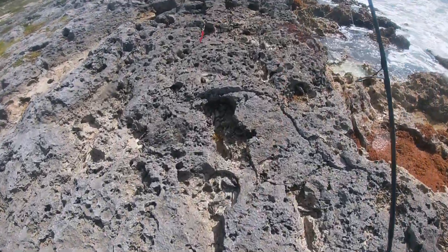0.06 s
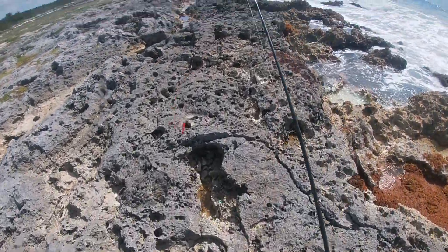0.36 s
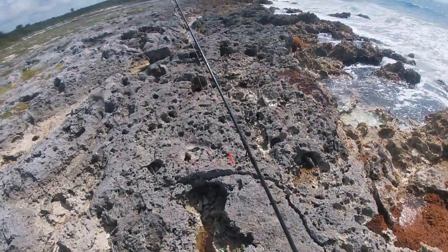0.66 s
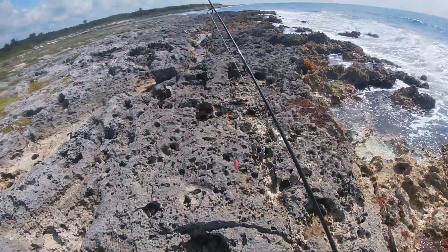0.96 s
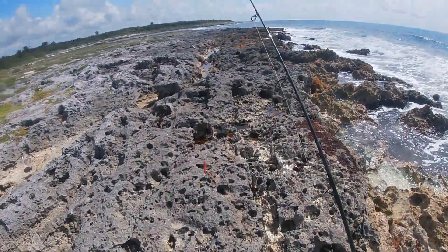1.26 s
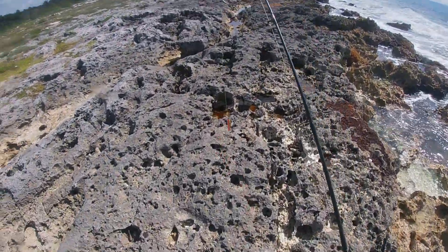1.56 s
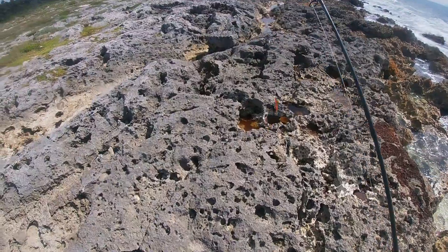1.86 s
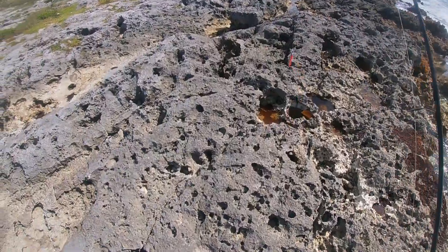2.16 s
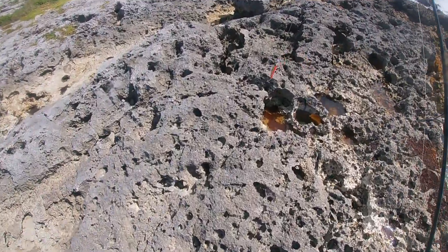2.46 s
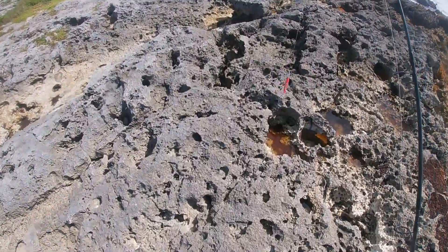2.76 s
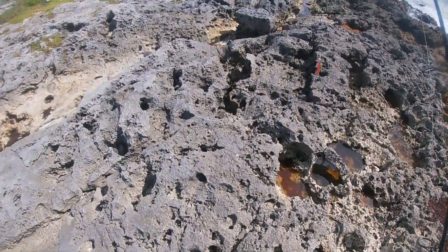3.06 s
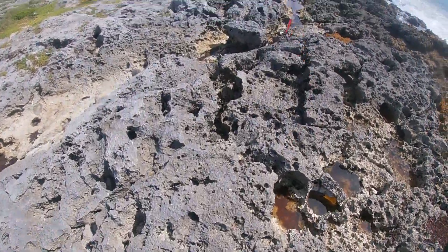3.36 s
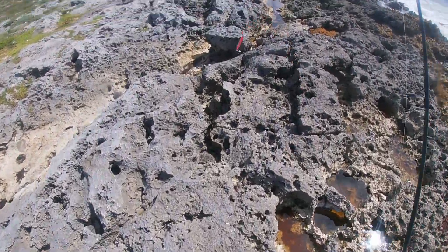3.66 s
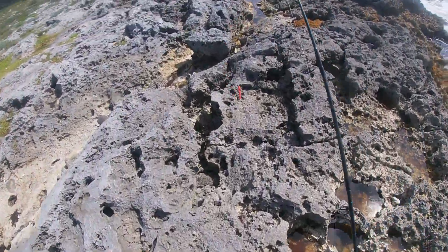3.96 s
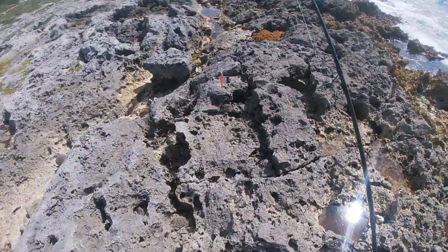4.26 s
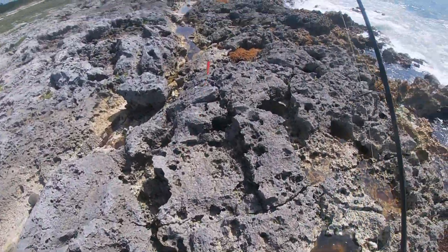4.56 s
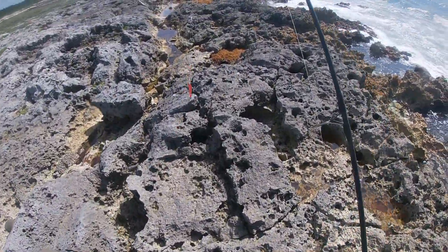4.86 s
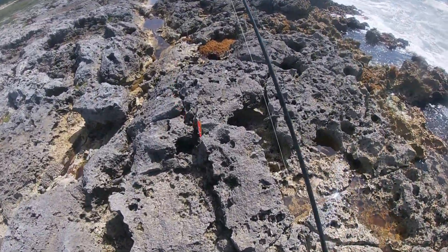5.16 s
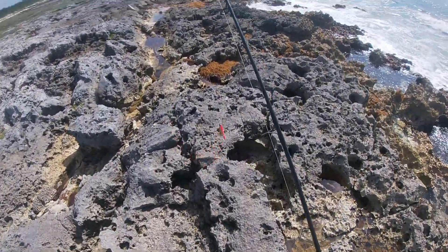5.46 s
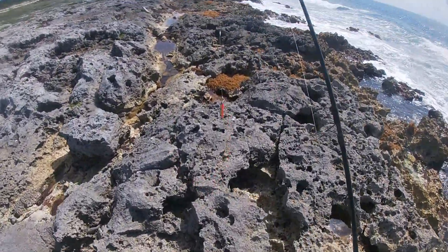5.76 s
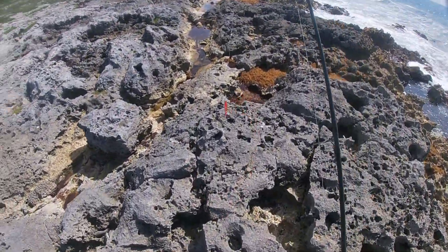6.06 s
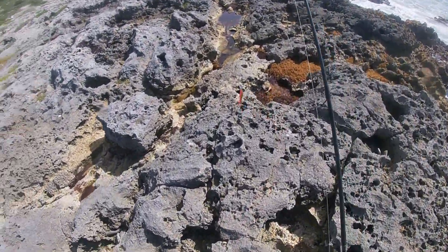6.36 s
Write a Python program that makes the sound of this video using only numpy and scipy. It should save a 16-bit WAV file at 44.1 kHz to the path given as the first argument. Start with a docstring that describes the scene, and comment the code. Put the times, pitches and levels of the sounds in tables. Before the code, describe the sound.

Slow footsteps on rock land as deep, dull thumps, with light gear clinks, over faint, hollow-sounding surf and wind.

```python
"""A rocky shore, crossed in slow steps and heard from a body-worn camera in a waterproof case.
Each footfall jolts the camera into a deep, dull thump; carried gear clinks and now and then a sole
scuffs grit. Waves swell over a steady wash, wind buffets the case, and a faint, airy hiss slowly fades.
The case gives surf, clinks and scuffs a hollow, ringing colour, and the camera's gain control
ducks the whole sound after the heaviest steps."""
import sys
import numpy as np
from scipy import signal
from scipy.fft import rfft, irfft
from scipy.io import wavfile
from scipy.ndimage import uniform_filter1d

SR = 44100
rng = np.random.default_rng(int(sys.argv[2]) if len(sys.argv) > 2 else 0)


def generate_wav(signal):
    """Clip the signal to [-1, 1] and save it as 16-bit WAV at the path in sys.argv[1]."""
    frames = np.transpose(np.atleast_2d(signal))
    scaled = np.clip(frames, -1, 1) * 32767
    pcm = np.round(scaled).astype(np.int16)
    wavfile.write(sys.argv[1], SR, pcm)


N = 287973
TIME, FREQS = np.arange(N) / SR, np.fft.rfftfreq(N, 1 / SR)


def gain_of(db):
    """Decibels to gain."""
    return 10 ** (np.asarray(db) / 20)


def unit_rms(x):
    """Scales to an rms of one."""
    return x / np.sqrt(np.mean(x ** 2) + 1e-30)


def eq_curve(points, hz):
    """Gain at each frequency, from (Hz, dB) points joined on a log-frequency axis."""
    point_hz, db = np.transpose(points)
    return gain_of(np.interp(np.log(hz + 1), np.log(point_hz + 1), db))


def resonances(modes, hz):
    """Power at each frequency of bell-shaped resonances, their widths taken at half power."""
    return sum(gain_of(db) ** 2 * 0.5 ** ((2 * (hz - centre) / width) ** 2) for centre, width, db in modes)


def noise(gains):
    """Noise of rms one, coloured by a gain at each frequency."""
    return unit_rms(irfft(rfft(rng.standard_normal(N)) * gains, N))


def swell(t, rise, fall):
    """A smooth build-up to one at time zero, easing into an exponential decay."""
    return np.exp(-(np.minimum(t, 0) / rise) ** 2 / 2) / np.cosh(np.clip(t / fall, 0, 50))


def swells(rows, floor_db):
    """Gain over time: each swell builds, peaks and ebbs, adding its power to a steady floor."""
    power = sum((gain_of(db) * swell(TIME - s, rise, fall)) ** 2 for s, db, rise, fall in rows)
    return np.sqrt(gain_of(floor_db) ** 2 + power)


def case_gain(hz):
    """The waterproof case passes sound mostly at the resonances of its walls and air space."""
    # The hollow ring of the case. Each row: centre in Hz, width in Hz, level in dB.
    modes = [(725, 124, -2.9), (1114, 239, -6), (1339, 82, -3.5), (1599, 193, -5.5), (1850, 156, -7.5),
             (2019, 159, 0.1), (2213, 125, -18.5), (2614, 254, -14), (2980, 190, -16), (3259, 183, -6.5),
             (3685, 315, -12.5), (4280, 220, -15.5), (4820, 430, -10.5), (5220, 460, -17.5),
             (6420, 710, -20.5), (7630, 290, -30), (8560, 860, -28.5), (10370, 940, -32.5)]
    # What leaks through the walls between resonances. Each row: frequency in Hz, level in dB.
    walls = [(60, -49), (150, -16), (300, -14.5), (480, -16.5), (900, -9), (1450, -28), (2380, -24.5),
             (4000, -24), (5800, -30.5), (7300, -32.5), (9500, -35.5), (12000, -40.5), (13500, -43.5),
             (16000, -57.5)]
    return np.sqrt(resonances(modes, hz) + eq_curve(walls, hz) ** 2)


def surf(sea_db=-62.5, boost_db=2, roar_hz=1020, fizz_hz=4330, patchy_db=0.88, flicker_db=0.31):
    """Foam hisses in drifting patches; the breakers add weight below and fizz above."""
    # Waves washing up the rock over the steady sea, both ahead of the boost.
    # Each row: crest time in seconds, level in dB, rise and fall in seconds.
    waves = [(1.38, -53.5, .55, 2.3), (3.45, -53, 1, 1.42), (4.15, -49.5, 0.32, 0.56),
             (5.88, -50.5, 0.88, 2.5)]
    # Weight of the breakers' roar. Each row: time in seconds, low shelf in dB.
    weight = [(0, 8), (.35, 5.5), (.7, -3.5), (2.0, -4), (3.0, -1.5), (3.5, 5), (4.2, -1.5), (5.0, 2.5),
              (5.8, -2), (6.25, 0)]
    # Fizz of the foam. Each row: time in seconds, high shelf in dB.
    fizz = [(0, -1), (.5, 0.5), (1.3, -1.5), (2.3, 1.5), (4.0, 0.9), (5.0, 2), (6.53, -0.5)]
    size, hop = 1024, 256
    t, hz = np.arange(N // hop + 5) * hop / SR, np.fft.rfftfreq(size, 1 / SR)
    real, imag, patches = rng.standard_normal((3, len(t), len(hz)))
    patches = uniform_filter1d(patches, size=10, axis=0)  # smeared in time, then in frequency
    patches = unit_rms(uniform_filter1d(patches, size=12, axis=1))
    flicker = unit_rms(uniform_filter1d(rng.standard_normal(len(t)), size=7))
    low_shelf, high_shelf = 1 / (1 + (hz / roar_hz) ** 4), 1 - 1 / (1 + (hz / fizz_hz) ** 8)
    tilt_db = np.outer(np.interp(t, *np.transpose(weight)), low_shelf)
    tilt_db += np.outer(np.interp(t, *np.transpose(fizz)), high_shelf)
    spectra = (real + 1j * imag) * gain_of(tilt_db + patchy_db * patches + flicker_db * flicker[:, None])
    wash = signal.istft(spectra.T, nperseg=size, noverlap=size - hop)[1][:N]
    hollow_wash = unit_rms(irfft(rfft(wash) * case_gain(FREQS), N))
    return hollow_wash * swells(waves, sea_db) * gain_of(boost_db)


def wind(breeze_db=-65.5):
    """Air flutters low around the case, swelling with each gust."""
    # Tone of the flutter. Each row: frequency in Hz, level in dB.
    flutter_eq = [(20, 3.5), (60, -12), (100, -16), (140, 0), (180, 5), (240, -3), (330, -13), (600, -17.5),
                  (2000, -76)]
    # Gusts buffeting the case. Each row: peak time in seconds, level in dB, rise and fall in seconds.
    gusts = [(.2, -53.5, .1, 0.14), (3.5, -58.5, 0.065, 0.17), (5.27, -60, 0.52, 0.15),
             (6.12, -55, 0.33, 0.27)]
    return noise(eq_curve(flutter_eq, FREQS)) * swells(gusts, breeze_db)


def airy_hiss(level_db=-60.5, hold_s=0.78, fade_db_per_s=3):
    """A faint, airy hiss with a thin ring, strongest at the start and slowly fading."""
    # Peaks that colour the hiss. Each row: centre in Hz, width in Hz, relative level in dB.
    hiss_peaks = [(414, 740, -10), (1343, 99, -4.5), (1468, 38, 1), (3530, 530, -12), (4070, 200, -46),
                  (5800, 730, -19)]
    fade_db = fade_db_per_s * np.maximum(TIME - hold_s, 0)
    return noise(np.sqrt(resonances(hiss_peaks, FREQS))) * gain_of(level_db - fade_db)


def jolt(t, thud, db, hz, decay, thud_db, rise_s=0.018, stiffness=0.0067):
    """A jolt swings the camera on its strap for a cycle or two and sends a soft thud through the body."""
    load = swell(t, rise_s, decay)  # the sole takes the weight gradually
    phase = 2 * np.pi * hz * t
    swing = np.sin(phase) + stiffness * load * np.sin(2 * phase)  # the taut strap adds an overtone
    return load * (gain_of(db) * swing + gain_of(thud_db) * thud)


def footfalls():
    """Each step is a run of jolts (heel, full weight, toes, rebound) over the walker's rocking."""
    # Footsteps. Each row: landing time in seconds, jolt in dB, swing in Hz, settling in seconds, thud
    # in dB, heel touch in dB, roll to the toes in seconds, toe push in dB, rebound in dB.
    steps = [(.313, -14.5, 24, 0.031, -44, -36, 0.12, -11, -19.5),
             (.807, -10, 32.4, 0.021, -46, -39, 0.136, -14.5, -27),
             (1.437, -6.5, 25.9, 0.024, -32, -30.5, 0.1274, -11, -35.5),
             (1.881, -16.5, 32.8, 0.036, -52.5, -42, .1, -18, -29),
             (2.532, -13, 26.8, 0.017, -51, -22.5, .096, -10, -29),
             (3.089, -15.5, 24.9, 0.031, -46.5, -35, 0.094, -16, -41),
             (3.809, -29, 24.8, 0.034, -52.5, -24, 0.1015, -26, -36),
             (4.388, -10.5, 26, 0.011, -42, -48, 0.095, -28, -47.5),
             (5.046, -19, 20.4, 0.026, -54, -32.5, 0.11, -18.5, -36),
             (5.698, -24, 32.4, 0.039, -50.5, -28.5, 0.082, -25, -34.5),
             (6.207, -10.5, 24.6, .02, -44.5, -37, 0.11, -17.5, -33)]
    # Body shifts between steps. Each row: time in seconds, jolt in dB, swing in Hz, settling in seconds.
    shifts = [(2.243, -28.5, 15, 0.02), (2.824, -33, 15.7, 0.046), (4.583, -33, 31.4, 0.044)]
    # Sub-bass of the rocking body. Each row: frequency in Hz, level in dB.
    sway_eq = [(5, -15.5), (16, 18.5), (28, -15.5), (45, 9.5), (70, -76), (150, -60), (400, -100)]
    # Tone of the dull thud. Each row: frequency in Hz, level in dB.
    thud_eq = [(20, -10.5), (60, -0.5), (90, -5), (115, -11), (145, -18), (250, -33), (500, -33.5),
               (1200, -97.5)]
    heel_lead_s, heel_hz, heel_decay_s = 0.0533, 32.1, 0.015
    toe_hz, toe_decay_s = 22.4, 0.012
    rebound_lag_s, rebound_decay_s = 0.068, 0.022  # the camera drops back on its strap
    heel_thud_db, toe_thud_db, shift_thud_db = -28, -33.5, -34.5  # each relative to its jolt
    rocking = 0.35 + sum(swell(TIME - s, 0.16, 0.16) ** 2 for s, *_ in steps)  # most around each step
    out = gain_of(-45) * rocking * noise(eq_curve(sway_eq, FREQS))
    thud = noise(eq_curve(thud_eq, FREQS))
    jolts = [(s, db, hz, settle, db + shift_thud_db) for s, db, hz, settle in shifts]
    for s, db, hz, settle, thud_db, heel_db, roll, toe_db, rebound_db in steps:
        jolts += [(s - heel_lead_s, heel_db, heel_hz, heel_decay_s, heel_db + heel_thud_db),
                  (s, db, hz, settle, thud_db),
                  (s + roll, toe_db, toe_hz, toe_decay_s, toe_db + toe_thud_db),
                  (s + roll + rebound_lag_s, rebound_db, toe_hz, rebound_decay_s, rebound_db + toe_thud_db)]
    for s, *shape in jolts:
        near = abs(TIME - s) < 0.3
        out[near] += jolt(TIME[near] - s, thud[near], *shape)
    return out


def burst(s, db, release_s, centre_hz, octaves, grains_per_s=640, grit_share=0.16, size=8192):
    """A short burst of rubbing and cracking in one band, partly coloured by the case."""
    t, hz = (np.arange(size) - size // 2) / SR, np.fft.rfftfreq(size, 1 / SR)
    rub, grains = rng.standard_normal((2, size))
    grains = unit_rms(grains * (rng.random(size) < grains_per_s / SR))
    press = np.exp(-0.5 * (t / np.where(t < 0, 0.09 * release_s, release_s)) ** 2)  # bites fast
    stroke = (np.sqrt(1 - grit_share) * rub + np.sqrt(grit_share) * grains) * press
    band = np.exp(-0.5 * (np.log2((hz + 1) / centre_hz) / octaves) ** 2)
    crunch = unit_rms(irfft(rfft(stroke) * band * case_gain(hz) ** 0.85))
    out, start = np.zeros(N + size), round(s * SR) - size // 2
    out[start:start + size] = gain_of(db) * crunch * np.sqrt(np.mean(press ** 2))
    return out[:N]


def clinks(low_ring_hz=1378, snap_hz=2400):
    """Carried gear rattles as a foot lands: a broad snap with a brief high and low ring."""
    # Light clinks of gear. Each row: peak time in seconds, level in dB, release in seconds,
    # high ring in Hz, then low ring and snap in dB relative to the high ring.
    hits = [(0.327, -55.5, 0.014, 3570, 11, -2), (0.752, -52.5, .0065, 3540, 2.5, -15),
            (0.795, -46, 0.0029, 4250, -2.5, -2), (1.399, -52.5, .016, 3350, -8, 1),
            (1.846, -49, 0.0042, 3700, -10, -12), (2.447, -47, .01, 3700, -3, 2)]
    return sum(burst(s, db, release, high_ring_hz, octaves=0.15)
               + burst(s, db + low_db, release, low_ring_hz, octaves=0.13)
               + burst(s, db + snap_db, release, snap_hz, octaves=1.2)
               for s, db, release, high_ring_hz, low_db, snap_db in hits)


def scuffs(knock_hz=152):
    """Grit crunches under the sole, which knocks dully on the rock."""
    # Soles on grit. Each row: peak time in seconds, level in dB, release in seconds, centre in Hz,
    # spread in octaves, knock in dB relative to the crunch.
    crunches = [(1.413, -42.5, 0.012, 980, 0.39, 1.5), (1.456, -36.5, 0.0076, 760, 0.52, -18),
                (2.996, -51.5, .015, 1490, 0.54, -19), (3.149, -45, 0.0059, 980, 0.44, -3)]
    return sum(burst(s, db, release, hz, octaves) + burst(s, db + knock_db, release, knock_hz, octaves=0.45)
               for s, db, release, hz, octaves, knock_db in crunches)


def scene():
    """Sea, wind and a faint hiss behind the walker's steps, in mono."""
    return (surf() + wind() + airy_hiss() + footfalls() + clinks() + scuffs())[None]


def record(dry):
    """Gain control ducks the mix after heavy steps and recovers slowly; the camera cuts the top treble."""
    threshold_db, duck_share, attack_s, recover_db_per_s = -13, 0.98, 0.11, 4.5
    cutoff_hz = 13980
    level_db = 20 * np.log10(abs(dry[0]) + 1e-9)
    target_db = duck_share * np.maximum(level_db - threshold_db, 0)
    recovery_db = recover_db_per_s * TIME
    held_db = np.maximum.accumulate(target_db + recovery_db) - recovery_db  # each peak ebbs steadily
    lag = np.exp(-1 / (attack_s * SR))
    duck_db = signal.lfilter([1 - lag], [1, -lag], held_db)
    lowpass = signal.firwin(511, cutoff_hz, window=("kaiser", 9), fs=SR)
    return signal.oaconvolve(dry * gain_of(-duck_db), lowpass[None], "same")


dry = scene()
out = record(dry)
generate_wav(out)
```